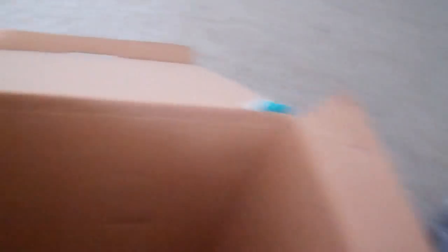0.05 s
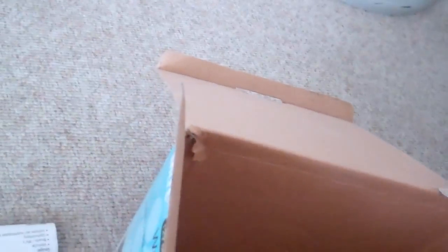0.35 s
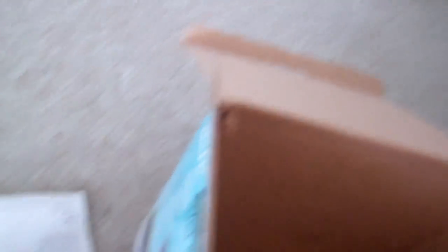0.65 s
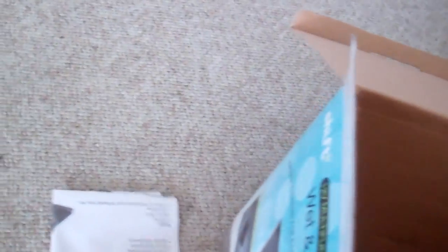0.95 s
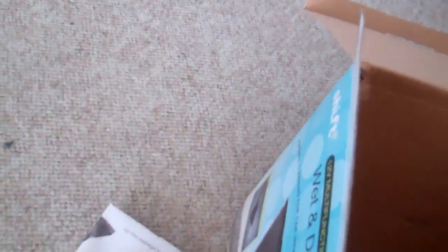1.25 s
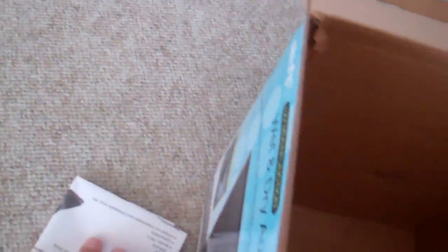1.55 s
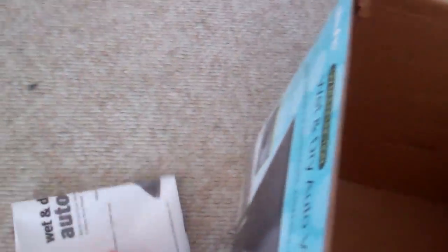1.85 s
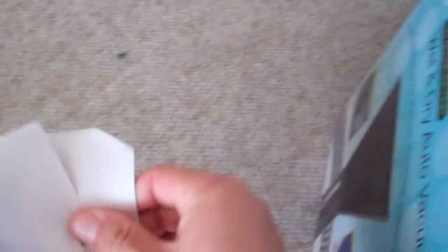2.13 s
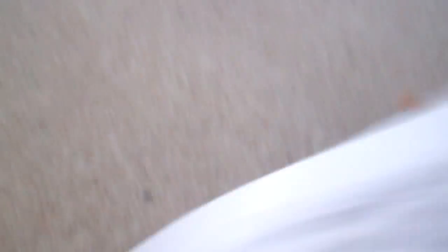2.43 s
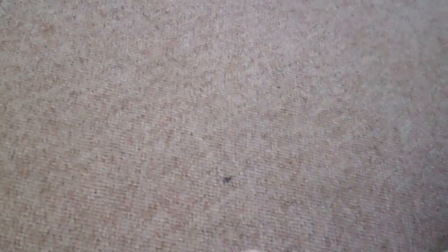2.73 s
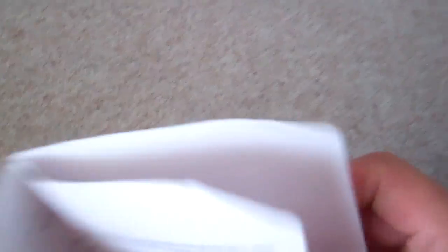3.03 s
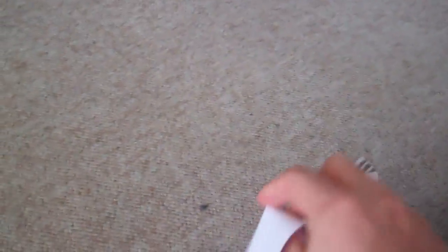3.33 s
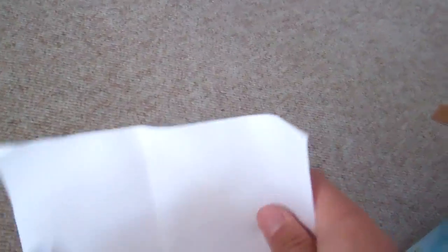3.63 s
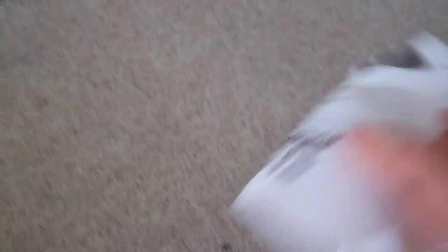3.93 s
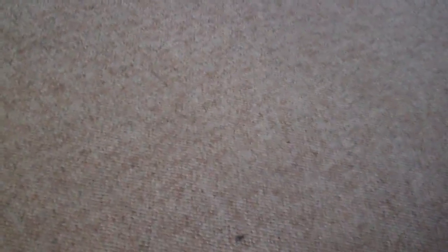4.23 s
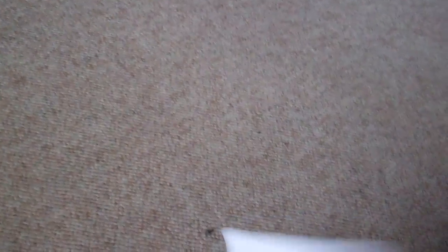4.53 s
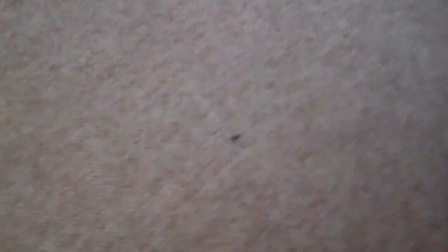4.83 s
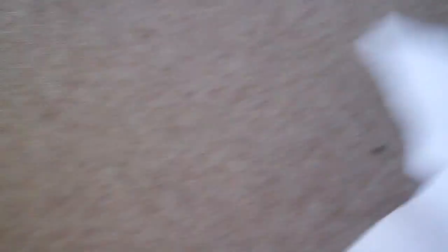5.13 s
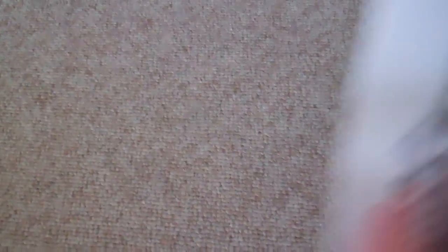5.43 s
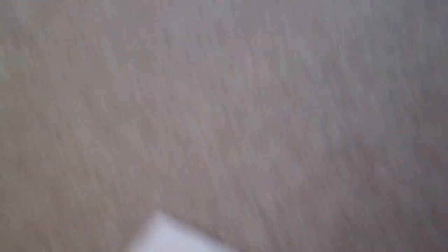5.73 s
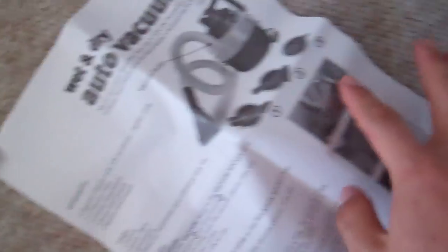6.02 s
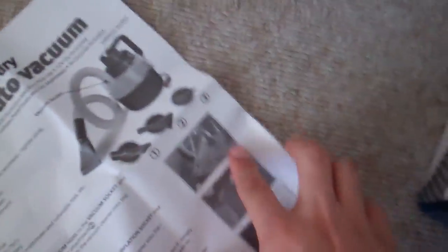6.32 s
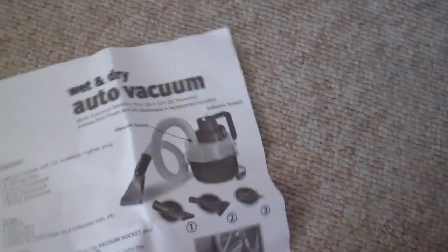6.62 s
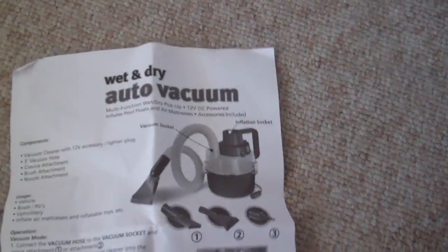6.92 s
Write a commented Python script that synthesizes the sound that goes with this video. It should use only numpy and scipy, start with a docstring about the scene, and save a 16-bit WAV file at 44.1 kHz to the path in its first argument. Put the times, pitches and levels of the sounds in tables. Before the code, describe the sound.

A folded paper leaflet is handled close to the microphone, slightly to the right, in a small carpeted room. Soft scrapes begin around 0.4 seconds, with the first crisp crinkles at about 1 second as it is picked up. From 1.7 to 3 seconds it is opened in short bursts of sliding paper and snapping creases. Sharp snaps cluster near 3.2 and 3.7 seconds. Dense crackling follows from 4 to 4.3 seconds, and the loudest rustle comes around 4.6 to 4.8 as the sheet is shaken out. Softer flexing and ticks lead to another crinkle at 5.5 seconds, a short lull, and a sharp snap near 6.2. A hand then smooths the sheet with a light hiss and a few ticks until about 7 seconds. A faint low room hum lies underneath, sinking after the louder snaps and swelling back.

```python
"""A small carpeted room, a stereo microphone close to a folded paper leaflet.
The leaflet is picked off the carpet, opened, shaken flat and smoothed by hand. Creases snap over and
set the sheet ringing for a few milliseconds; between snaps paper slides on paper and crackles.
Behind it lies the low drone of the room, which sinks after the loudest snaps and swells back."""
import sys
import numpy as np
from scipy import signal
from scipy.fft import rfft, irfft
from scipy.io import wavfile
from scipy.ndimage import uniform_filter1d

SR = 44100
rng = np.random.default_rng(int(sys.argv[2]) if len(sys.argv) > 2 else 0)


def master_out(mix):
    """Clip the mix to full scale and print it as 16-bit PCM to the path in sys.argv[1]."""
    frames = np.transpose(np.atleast_2d(mix))
    ceiling = np.clip(frames, -1, 1)
    pcm = np.round(ceiling * 32767).astype(np.int16)
    wavfile.write(sys.argv[1], SR, pcm)


N = 311787
HZ = np.fft.rfftfreq(N, 1 / SR)
TIME = np.arange(N) / SR
SIDES = np.array([[.5], [-.5]])  # splits a balance in dB between left and right

# Spectrum of the flexing sheet. Each row: frequency in Hz, relative level in dB.
FLEX_SPECTRUM = [(100, -16.5), (220, -7), (400, -3.5), (700, 0), (1200, 0), (1700, -8.5), (3000, -56.5)]
# How alike the paper sounds left and right. Each row: frequency in Hz, likeness (clipped to 0-1).
PAPER_LIKENESS = [(100, 1.5), (1400, 0.94), (3000, 0.88), (6500, 0.6), (10000, 0), (14500, 0.33)]
# Balance at the microphone. Each row: frequency in Hz, left minus right in dB.
MIC_BALANCE = [(60, -7), (200, -4.5), (700, -1.5), (2400, -0.7), (4500, -1), (8000, 1.3), (14500, 2)]


def crease_snaps(level_db=-0.17, click=3.2, build_share=0.34, after_db=-27, after_s=0.0068,
                 spread_octaves=0.77, spread_doubling_db=31, skirt=4.1, ripple_db=2.5,
                 crack_db=-17.5, crack_s=0.0005, quick_s=0.0019, loss_db_per_doubling=11,
                 thud_db=-0.5, thud_s=0.0037, treble_hz=10000, bass_hz=500, size=2048):
    """A crease gives way in tiny slips around a click and a bright crack; the panel beside it thuds."""
    # Each row: time in seconds, peak level in dB, length in seconds, centre in Hz,
    # thud relative to the peak in dB.
    snaps = [(0.3875, -39.5, .002, 2950, -33), (0.8085, -43, .0013, 6000, -10),
             (0.8174, -38.5, 0.0023, 4800, -14), (0.959, -34, 0.0017, 1140, -4),
             (.9735, -39.5, 0.0029, 960, 4.5), (1.0125, -34.5, 0.0012, 1380, -10),
             (1.019, -23.5, 0.0011, 2940, -22), (1.08, -25, 0.001, 3340, -16.5),
             (1.09, -31, .0048, 2030, -14), (1.1002, -30.5, 0.0076, 4500, -7.5),
             (1.124, -37.5, 0.0037, 2370, -22), (1.297, -37.5, 0.0015, 1150, -11),
             (1.4467, -41, 0.0014, 1950, -9), (1.487, -32.5, 0.0021, 3040, -9.5),
             (1.741, -34.5, 0.018, 2700, -8), (1.8778, -27.5, 0.004, 1900, -5),
             (1.925, -22, 0.0025, 3200, -13), (1.9781, -25.5, 0.0038, 2240, -8.5),
             (2.045, -27, 0.0016, 4420, -18), (2.0788, -27, 0.002, 3220, -39),
             (2.228, -40.5, 0.0015, 1750, -15), (2.32, -27, 0.0033, 4000, -33),
             (2.388, -41, .002, 1810, -2), (2.492, -28, 0.0042, 2200, -6),
             (2.4972, -21.5, 0.0073, 2250, -10), (2.5048, -23.5, 0.0027, 2840, -13),
             (2.617, -43.5, 0.0052, 3650, -15.5), (2.704, -58.5, .003, 2980, -12),
             (2.798, -44, 0.0042, 1400, 0), (2.8404, -36, 0.00093, 3150, -27),
             (2.8715, -39, 0.0014, 3680, -27), (2.896, -21.5, 0.0034, 2650, -33),
             (2.939, -29, 0.0058, 2540, -10.5), (3.1917, -22.5, 0.0013, 3040, -15.5),
             (3.218, -19, .0016, 2850, -20), (3.227, -23, 0.0024, 2650, -47),
             (3.272, -18.5, 0.00089, 2840, -17), (3.2826, -28, 0.0051, 2960, -6),
             (3.288, -25.5, 0.003, 2860, -15), (3.331, -43, 0.0083, 2230, -4),
             (3.3878, -44, 0.0018, 1650, -27), (3.4976, -29, 0.0051, 3180, -11.5),
             (3.534, -32, .004, 2460, -28), (3.5394, -32.5, 0.0039, 2200, -3),
             (3.6553, -24.5, 0.0011, 1910, -16), (3.666, -25.5, 0.0053, 2690, -14),
             (3.706, -24.5, 0.0031, 3200, -26), (3.771, -36, 0.0019, 1700, -6),
             (3.78, -31.5, 0.0025, 1980, -6.5), (3.81, -39.5, 0.0068, 890, -12),
             (3.842, -45.5, 0.0034, 1450, 3.5), (3.872, -37.5, 0.0036, 2610, -31),
             (3.8985, -39, 0.002, 1420, -5), (3.958, -44.5, 0.008, 2980, -3.5),
             (4.044, -28, 0.004, 2550, -5.5), (4.0522, -26.5, 0.0017, 3530, -8.5),
             (4.0927, -34, 0.0026, 1090, -7), (4.081, -42, .002, 2220, -9), (4.114, -34, 0.0027, 2260, -13),
             (4.149, -37, .0013, 5000, -10), (4.1543, -26.5, 0.0045, 3170, -17),
             (4.169, -30, 0.0056, 2620, -11), (4.196, -35, 0.0036, 3800, -4),
             (4.204, -25, 0.0028, 3200, -30), (4.211, -23, 0.0063, 3100, -16),
             (4.222, -25, 0.0072, 3000, -22), (4.301, -28, .0016, 3360, -16),
             (4.379, -38.5, .0016, 2370, -11), (4.547, -44, 0.0033, 1170, -4),
             (4.5806, -30.5, 0.0038, 2680, -20), (4.5897, -26.5, 0.0036, 3180, -22),
             (4.612, -24.5, 0.002, 2290, -18), (4.6264, -24, 0.006, 2650, -17),
             (4.6446, -28, 0.0023, 2440, -20), (4.678, -28, 0.011, 2200, -15),
             (4.6963, -22, 0.0025, 2270, -18), (4.704, -27, .003, 2650, -17),
             (4.7143, -24.5, 0.0081, 1930, -6), (4.728, -32, .0028, 2800, -15),
             (4.7385, -26, 0.0022, 3480, -20), (4.745, -24, 0.0034, 3270, -20),
             (4.7475, -23.5, 0.0044, 3560, -47), (4.7587, -27, 0.0024, 3470, -16),
             (4.7708, -26.5, 0.0028, 3700, -30), (4.7834, -32.5, 0.0016, 2610, -19),
             (4.949, -45.5, 0.009, 4500, -15), (5.015, -47, 0.0025, 5540, -10),
             (5.062, -47, 0.0027, 4200, -2), (5.0276, -40, 0.0035, 2650, -6),
             (5.14, -49, 0.00085, 1990, -5), (5.1752, -37.5, .0033, 1770, -10),
             (5.1806, -35.5, 0.0071, 477, -16), (5.2133, -34, 0.0042, 1000, -25),
             (5.129, -41, 0.0044, 700, -27), (5.281, -42.5, 0.012, 332, -20),
             (5.4006, -42.5, 0.0032, 1420, -11), (5.422, -42.5, 0.0052, 3000, -10),
             (5.437, -35.5, 0.0062, 1610, -21), (5.491, -36, 0.0043, 2900, -10),
             (5.503, -35, .0025, 3150, -24), (5.527, -25, 0.01, 2540, -9.5),
             (5.539, -34, 0.0037, 3980, -22), (5.662, -53.5, .004, 3000, -5), (5.99, -51, 0.011, 2730, -16),
             (6.1525, -43.5, 0.0026, 1990, -10), (6.228, -28.5, 0.0035, 1640, -2.5),
             (6.238, -23.5, 0.0033, 1910, -27), (6.253, -19.5, 0.0017, 3000, -18),
             (6.379, -31, 0.0025, 3270, -19), (6.554, -32, 0.0048, 2180, -10),
             (6.6325, -26.5, 0.0013, 2900, -18), (6.655, -36.5, 0.0026, 2070, -8),
             (6.726, -32.5, .004, 2110, -11), (6.7331, -29.5, 0.0021, 2760, -13)]
    # Each row: frequency in Hz, relative level of the crack in dB.
    crack_spectrum = [(800, -32), (4000, 6), (8000, 9), (11000, 1), (14500, -6)]
    out, slips = np.zeros((2, N)), noise_pair(PAPER_LIKENESS)
    hz, lead = np.fft.rfftfreq(size, 1 / SR) + 1, size // 4
    t = (np.arange(size) - lead) / SR
    # a small patch of sheet radiates little bass, and its highest bending waves die at once
    limits_db = -10 * np.log10((1 + (hz / treble_hz) ** 10) * (1 + (bass_hz / hz) ** 2))
    for time, db, length, centre_hz, flex_db in snaps:
        start = round(time * SR) - lead
        swell = np.exp(-abs(t) / (length * np.where(t < 0, build_share, 1 - build_share)))
        swell += (t > 0) * gain_of(after_db) * np.exp(-abs(t) / after_s)
        burst = slips[:, start:start + size] * swell
        burst[:, lead] += click
        # the more the panel flexes, the wider the snap's spectrum
        width_octaves = spread_octaves * 2 ** (flex_db / spread_doubling_db)
        off_centre = np.log2(hz / centre_hz) / width_octaves
        hump_db = -10 * (1 + skirt) * np.log10(1 + off_centre ** 2 / (2 * skirt))
        hump_db -= 5 * np.log10(1 + hz / centre_hz)
        # every new shape of the sheet has its own modes
        modes_db = ripple_db * unit_rms(uniform_filter1d(rng.standard_normal(len(hz)), size=18))
        snap = struck(burst, hump_db + modes_db + limits_db, size=60)
        add(out, start, snap * gain_of(db + level_db))
        # the quicker the crease gives way, the stronger its crack
        jolt = slips[:, start:start + size] * np.exp(-abs(t) / crack_s)
        crack = struck(jolt, curve_at(crack_spectrum, hz), size=60)
        loss_db = loss_db_per_doubling * max(np.log2(length / quick_s), 0)
        add(out, start, crack * gain_of(db + crack_db - loss_db))
        flex = rng.standard_normal((1, size)) * (t >= 0) * np.exp(-abs(t) / thud_s)
        thud = struck(flex, curve_at(FLEX_SPECTRUM, hz) + modes_db, size=130)
        add(out, start, thud * gain_of(db + flex_db + thud_db))
    return out


def rubbing(scrape_db=-1.0, fizz_db=0.72, grain_db=1.85, flutter_db=3.5):
    """Fibres catch and slip; the more the sheet buckles, the more the hiss breaks into crackle."""
    # The scrape and the fine fizz above it. Each row: frequency in Hz, relative level in dB.
    scrape_spectrum = [(500, -27), (1100, -8.5), (1600, -4.5), (2500, 2), (3500, 0.5), (5000, -4.5),
                       (6300, -10.5), (9000, -46)]
    fizz_spectrum = [(3000, -14), (5000, -4), (6500, -3.5), (8500, -5.5), (10500, -9.5), (12500, -16.5),
                     (14500, -31)]
    scrape, flex, fizz, buckle = hand_strokes()
    grip = gain_of(grain_db * wander(size=200))
    # edges of a buckling sheet touch and part, so the fizz comes in short swishes
    fizz = fizz * gain_of(fizz_db + flutter_db * buckle * wander(size=700))
    voices = [(FLEX_SPECTRUM, flex, buckle),
              (scrape_spectrum, scrape * gain_of(scrape_db), buckle),
              (fizz_spectrum, fizz, buckle / 2)]
    shared_crackle, out = crackle(), np.zeros((2, N))
    for spectrum, level, share in voices:
        # some buckles sound in all three voices, some in only one
        power = 1 - share + share * (shared_crackle + crackle()) / 2
        friction = noise_pair(PAPER_LIKENESS) * grip * np.sqrt(power)
        out += colour(friction, curve_at(spectrum, HZ)) * level
    return bending(out)


def hand_strokes(grab_s=0.007, release_db_per_s=407):
    """Strokes grip fast and fade as the hand stops: scrape, flex and fizz amplitudes, buckling share."""
    # Paper on paper, skin or carpet. Each row: start in seconds, length in seconds, scrape level in dB,
    # swell over the stroke in dB, flex and fizz relative to the scrape in dB, buckling share from 0 to 1.
    strokes = [(0.382, 0.14, -52.5, 0, -7, -4, 0.4), (0.801, 0.23, -48.5, 1.5, -5.5, -6.5, 0.4),
               (0.982, 0.16, -46, -7, -4.5, -2.5, .95), (1.13, 0.16, -64, -18, -1, -3.5, 0.8),
               (1.279, 0.12, -59, 3.5, -3, 3.5, 0.3), (1.449, .13, -51, 4.5, -5, -1.5, 0.56),
               (1.663, 0.19, -46, 0, -8, -2, 0), (1.883, 0.2, -44, -7.5, -14.5, -5, 1),
               (2.136, 0.0096, -51, -5, -28, -2, 0.7), (2.178, 0.337, -50.5, -5, -8.5, -5, 0.73),
               (2.538, .08, -59.5, 4, -15, -10, .95), (2.775, 0.107, -62.5, -1, 3, -11, .95),
               (2.871, 0.077, -42.5, 3, -4, -7, .95), (2.976, 0.18, -54.5, -5, -4, -0.5, 0.8),
               (3.198, 0.088, -49, 4, -0.5, -7.5, .95), (3.317, 0.27, -62, -19, -4, -8.5, 0.8),
               (3.482, 0.097, -50, 2, -0.5, -14, .95), (3.618, 0.091, -46, -4.5, 0.5, -11, 0),
               (3.741, 0.19, -55.5, -15, -2.5, 1.5, 0.4), (3.969, 0.26, -50, -6, -1.5, -8, 0.98),
               (4.184, 0.14, -43, -6, -3.5, -11, 0.2), (4.345, .22, -56, 10, -3.5, -6, 0.9),
               (4.58, 0.083, -45, 0, 2, -18, 0.2), (4.675, 0.063, -32.5, 3, -5.5, -10, 0.1),
               (4.788, 0.15, -62.5, -18.5, -7.5, 0.5, 0.6), (4.916, 0.196, -61.5, 0.5, -4, -6, 0.9),
               (5.131, 0.015, -50, 6, -3.5, -6.5, .95), (5.276, 0.0073, -54, 0, 0, 3.5, .95),
               (5.323, 0.15, -59, 4, 4.5, -3, 1), (5.489, 0.027, -41.5, 11.5, -6.5, -9, 1),
               (5.562, 0.094, -67, -8, -14, -4.5, .8), (5.691, 0.078, -53.5, -3.5, -4, -6, 0.56),
               (6.164, 0.075, -44, 12, -3, -6.5, .55), (6.275, 0.217, -52, 0.5, -14, -1, 0.2),
               (6.511, 0.15, -49.5, 3.5, -10, 1.5, 0.15), (6.682, 0.12, -52.5, -2.5, -12, -1.5, 0),
               (6.822, 0.046, -55.5, 7.5, -12.5, -1, 0.4), (6.89, .18, -60, 12, -9, -2.5, 0)]
    # The held sheet always whispers: scrape, flex and fizz in dB.
    whisper_db = (-80, -83.5, -82)
    power = np.outer(gain_of(whisper_db) ** 2, np.ones(N))
    buckling = np.zeros(N)
    for start, length, db, swell_db, flex_db, fizz_db, share in strokes:
        first = round(start * SR)
        t = TIME[:N - first][:SR]
        shape_db = swell_db * (np.minimum(t / length, 1) - .5)
        shape_db -= release_db_per_s * np.maximum(t - length, 0)
        stroke = (np.minimum(t / grab_s, 1) * gain_of(db + shape_db)) ** 2
        add(power, first, stroke * gain_of([[0], [flex_db], [fizz_db]]) ** 2)
        add(buckling[None], first, stroke[None] * share)
    return (*np.sqrt(power), buckling / power[0])


def crackle(per_s=800, spread_db=6.0, decay_s=0.0015):
    """Power envelope of many tiny buckles of uneven size, with a steady mean."""
    sizes = gain_of(spread_db * np.minimum(rng.exponential(1, N), 3)) ** 2
    hits = sizes * (rng.random(N) < per_s / SR)
    power = signal.lfilter([1], [1, -np.exp(-1 / (SR * decay_s))], hits)
    return power / (uniform_filter1d(power, size=1100) + power.mean() / 20)


def bending(x, patchy_db=2.5, rasp_db=1.5, rasp_width_hz=170):
    """The sheet changes shape as it moves, so its resonances come and go around one steadier rasp."""
    # The rasp is set by how the sheet is held. Each row: time in seconds, frequency in Hz.
    rasp_path = [(.55, 3350), (.9, 2420), (1.8, 2330), (3.1, 2480), (4.7, 3380), (6.5, 2450)]
    hz, times, frames = signal.stft(x, SR, nperseg=256, noverlap=192)
    patches = rng.standard_normal((len(times), len(hz))).T
    patches = unit_rms(uniform_filter1d(uniform_filter1d(patches, size=2, axis=0), size=20, axis=1))
    rasp_hz = np.interp(times, *np.transpose(rasp_path))
    rasp = 1 / (1 + ((hz[:, None] - rasp_hz) / rasp_width_hz) ** 2)
    frames = frames * gain_of(patchy_db * patches + rasp_db * rasp)
    return signal.istft(frames, SR, nperseg=256, noverlap=192)[1][:, :N]


def sheet_position():
    """Left and right gain as the sheet moves about, a little to the right of the microphone."""
    # Each row: time in seconds, left minus right in dB.
    sheet_path = [(1, -.8), (2.1, -0.5), (2.5, -2), (2.9, -1), (3.25, -1.5), (4.7, -1.5), (5.25, -2),
                  (5.48, -6), (5.8, -0.5), (6.7, -1)]
    return gain_of(np.interp(TIME, *np.transpose(sheet_path)) * SIDES)


def wall_reflections(x, wet_db=-18, first_s=0.0017, size=16384):
    """Sparse reflections from the near walls, dying quickly in the carpeted room."""
    # Each row: frequency in Hz, reverberation time in seconds.
    room_t60 = [(150, 0.077), (1000, 0.15), (4000, 0.15), (12000, 0.25)]
    t = np.arange(size) / SR
    taps = rng.standard_normal((2, size)) * (rng.random((2, size)) < 1 / 20) * (t > first_s)
    hz, times, frames = signal.stft(taps, SR, nperseg=256)
    decay = gain_of(-60 * times / curve_at(room_t60, hz)[:, None])
    tail = signal.istft(frames * decay, SR)[1]
    return gain_of(wet_db) * signal.fftconvolve(x, tail / np.linalg.norm(tail[0]), axes=1)[:, :N]


def room_drone(level_db=-49, floor_db=-85, hum_hz=119.3, hum_db=-7.5, waver_hz=3, waver_db=2.5,
               whine_hz=7868, whine_db=-26.5):
    """Low room noise with a wavering hum and a faint electrical whine; a trace always remains."""
    # Each row: frequency in Hz, relative level of the noise in dB.
    noise_spectrum = [(20, -23), (45, -17.5), (70, -9.5), (90, -6.5), (125, -2.5), (180, -8), (270, -12.5),
                      (560, -13.5), (900, -18), (1300, -19), (3000, -25), (6500, -31), (11000, -41.5),
                      (14500, -62)]
    # Two narrow resonances. Each row: centre in Hz, width in Hz, level in dB on the same scale.
    resonances = [(732, 50, -14), (1270, 70, -15)]
    # Each row: frequency in Hz, likeness of left and right from 0 to 1.
    room_likeness = [(60, 0.99), (150, 0.93), (630, 0.78), (1400, 0.45), (3000, 0.14), (6700, 0.065)]
    power = gain_of(curve_at(noise_spectrum, HZ)) ** 2
    for hz, width, db in resonances:
        power += (gain_of(db) / (1 + (2 * (HZ - hz) / width) ** 2)) ** 2
    noise = colour(noise_pair(room_likeness), 10 * np.log10(power))
    hum_turns = np.cumsum(hum_hz + waver_hz * wander(size=3000)) / SR
    hum_sides = gain_of(curve_at(MIC_BALANCE, hum_hz) * SIDES)
    hum = unit_rms(hum_sides * np.sin(2 * np.pi * hum_turns) * gain_of(waver_db * wander(size=3500)))
    whine_turns = np.cumsum(whine_hz + 20 * wander(size=600)) / SR
    whine = unit_rms(np.sin(2 * np.pi * whine_turns))
    level = np.hypot(gain_of(level_db + drone_dips_db()), gain_of(floor_db))
    return (noise + gain_of(hum_db) * hum + gain_of(whine_db) * whine) * level


def drone_dips_db(sink_s=0.044, curve=1.15):
    """The drone falls quickly at each dip and climbs back, fast at first and then more slowly."""
    # Dips timed to follow flurries of snaps. Each row: start in seconds, depth in dB, recovery in seconds.
    dips = [(1.06, 16.5, 0.46), (1.5, 3, 2.2), (2.03, 17, 0.45), (2.51, 46, 0.67), (3.26, 29, .44),
            (3.69, 13.5, 0.7), (4.04, 13.5, 2), (4.27, 8.5, 0.69), (4.74, 17, 0.42), (5.52, 23.5, 0.54),
            (6.22, 18, 0.88)]
    return -sum(depth * np.interp(TIME - start, [0, sink_s, sink_s + recovery], [0, 1, 0]) ** curve
                for start, depth, recovery in dips)


def struck(force, spectrum_db, size):
    """A short force rings through a spectrum; its loudest stretch of size samples has rms 1."""
    log_gain = np.log(gain_of(np.concatenate([spectrum_db, spectrum_db[-2:0:-1]])))
    # minimum phase: it rings only after it is struck
    response = np.exp(np.conj(signal.hilbert(log_gain)))[:len(spectrum_db)]
    ring = irfft(rfft(force) * response)
    return ring / np.sqrt(uniform_filter1d(ring.mean(0) ** 2, size=size).max())


def noise_pair(likeness):
    """White noise at two microphone ports, alike in the bass and less so in the treble."""
    left, other = rng.standard_normal((2, 2 * len(HZ))).view(complex) * np.sqrt(N / 2)
    same = np.clip(curve_at(likeness, HZ), 0, 1)
    right = same * left + np.sqrt(1 - same ** 2) * other
    return irfft(np.array([left, right]), N)


def colour(x, db):
    """Gives a stereo sound a spectrum and the microphone's balance, at rms 1."""
    balance_db = curve_at(MIC_BALANCE, HZ) * SIDES
    return unit_rms(irfft(rfft(x) * gain_of(db + balance_db), N))


def wander(size):
    """Random drift of rms 1 that changes about every size samples."""
    return unit_rms(uniform_filter1d(uniform_filter1d(rng.standard_normal(N), size=size), size=size // 2))


def gain_of(db):
    """Decibels to amplitude."""
    return 10 ** (np.asarray(db) / 20)


def unit_rms(x):
    """Scales to rms 1."""
    return x / np.sqrt(np.mean(x ** 2) + 1e-20)


def curve_at(points, hz):
    """Interpolates a table on a log-frequency axis."""
    points_hz, values = np.transpose(points)
    return np.interp(np.log(hz + 1), np.log(points_hz), values)


def add(mix, start, sound):
    """Mixes a sound's channels in from a sample on."""
    part = mix[:, max(start, 0):][:, :sound.shape[1]]
    part += sound[:, :part.shape[1]]


def scene():
    """The paper close to the microphone, its reflections, and the room's drone behind."""
    paper = (crease_snaps() + rubbing()) * sheet_position()
    return paper + wall_reflections(paper) + room_drone()


def record(dry):
    """The recorder's band limit cuts the highest treble."""
    low_pass = signal.firwin(255, cutoff=14350, window=("kaiser", 8), fs=SR)
    return signal.oaconvolve(dry, low_pass[None], "same", axes=1)


dry = scene()
out = record(dry)
master_out(out)
```